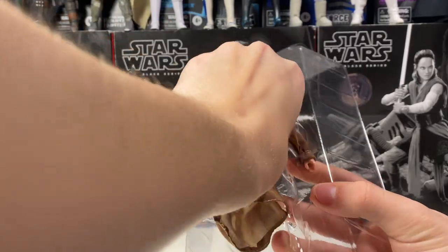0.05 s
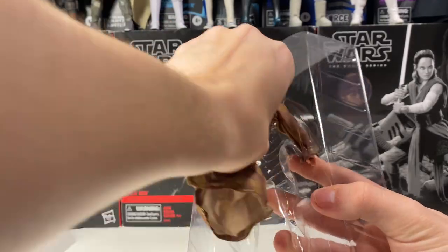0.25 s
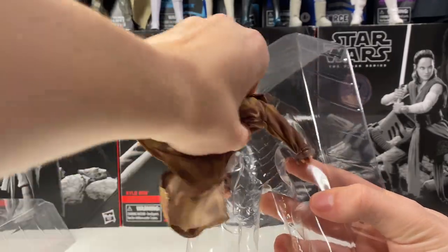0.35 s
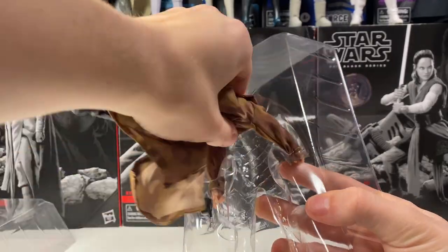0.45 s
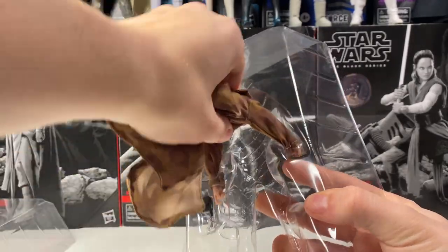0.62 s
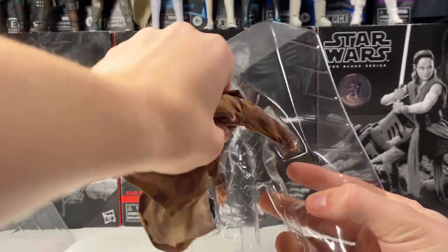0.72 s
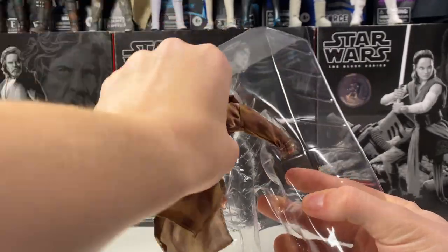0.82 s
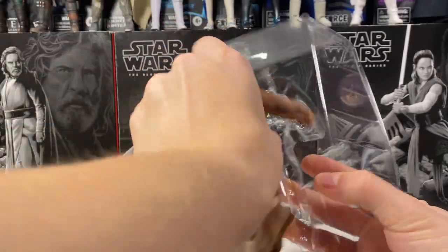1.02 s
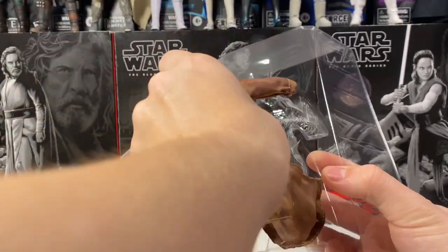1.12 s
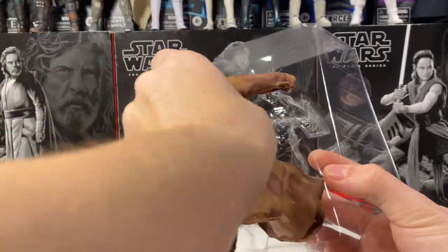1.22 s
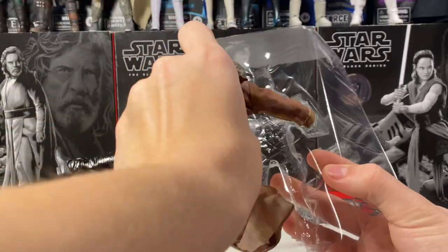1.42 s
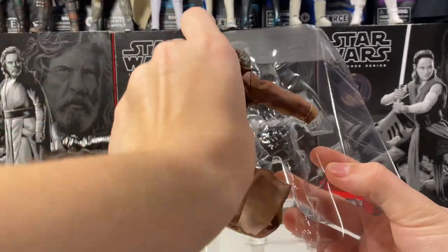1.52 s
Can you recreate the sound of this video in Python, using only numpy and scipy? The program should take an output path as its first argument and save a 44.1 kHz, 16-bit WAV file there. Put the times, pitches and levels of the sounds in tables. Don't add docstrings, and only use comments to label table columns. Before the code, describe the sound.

Close phone pickup of hands working a toy from a clear plastic tray: faint ticks, a hard crack, creaky bending mid-way, more bright snaps around one second and after, over soft rumble in a small room.

```python
import sys
import numpy as np
from scipy import signal
from scipy.fft import rfft, irfft
from scipy.io import wavfile
from scipy.ndimage import uniform_filter1d

SR = 44100
rng = np.random.default_rng(int(sys.argv[2]) if len(sys.argv) > 2 else 0)


def ratio_of_db(decibels):
    return 10 ** (np.asarray(decibels, float) / 20)


def master_out(mix):
    frames = np.transpose(np.atleast_2d(mix))
    ceiling = np.clip(frames, -1, 1)
    pcm = np.round(ceiling * 32767).astype(np.int16)
    wavfile.write(sys.argv[1], SR, pcm)


N = 68355
SPAN = 4096
EVEN_HZ = 250
PUSH_CYCLES = 0.55

# start in seconds, wall level in dB, wall pitch in Hz,
# bowl in dB re walls, ribs in dB re walls.
SNAPS = [(.2437, 0, 1930, -23, -8), (.2772, -28.5, 1940, -9, 13), (.2850, -27.5, 1940, -44, 9),
         (.3657, -21, 2320, -15.5, 1.5), (.3932, -20, 1450, 4, -22), (.3965, -20.5, 2600, -6.5, -7.5),
         (.5930, -26.5, 1650, -5, -9.5), (.5995, -35, 1740, -15, 1), (.6048, -17.5, 1680, -3.5, -3.5),
         (.8098, -25.5, 1680, -33, -4.5), (.8822, -16, 1700, -39, -21.5), (.9175, -21.5, 1990, -9.5, -5.5),
         (.9330, -20, 1870, 0.5, -0.5), (1.0250, -12.5, 2600, -27, -3.5), (1.0400, -29, 2300, 3, -2),
         (1.2502, -21, 1940, -4, -0.5), (1.2517, -18, 1340, -2.5, 11), (1.2580, -24, 2100, -8, -15),
         (1.4060, -28.5, 1590, 1, -12), (1.4578, -34, 1500, 4, 6.5), (1.4865, -26.5, 1710, -12, -7),
         (.1700, -31.5, 1640, -1, -5), (.2025, -30, 1610, -5, -9), (.7640, -31.5, 1830, -2, -12),
         (.0483, -33.5, 1570, -31, -11)]


def snaps():
    return volleys(SNAPS, spread_s=0.003, lead_db=-0.9, count=6)


# start in seconds, wall level in dB, wall pitch in Hz,
# bowl in dB re walls, ribs in dB re walls.
TICKS = [(.0185, -38.5, 1630, -20, 0), (.0225, -43.5, 1800, -0.5, 9), (.0575, -34, 1580, -31, -1.5),
         (.0672, -33, 1560, -29.5, -7), (.079, -40.5, 1460, 5, -1.5), (.503, -42, 1570, -12, -4.5),
         (.616, -40, 1570, -24, -19), (.626, -34, 1520, -6, -17), (.7325, -37.5, 1560, -8, -18),
         (.749, -36.5, 1700, 1, -27), (.7765, -33, 1640, -3, -51), (.787, -39, 1690, 6, -29),
         (.794, -32, 1580, 3.5, -22), (.948, -27, 1580, -16, -13), (.965, -28.5, 1550, -0.5, -34),
         (.987, -33.5, 1800, 1, -17), (1.282, -38, 1600, -21, -8), (1.377, -49, 1830, 8, 15),
         (1.383, -33.5, 1820, -1, -37)]


def ticks():
    return volleys(TICKS, spread_s=0.00083, lead_db=-2.0, count=4)


# start in seconds, wall level in dB, wall pitch in Hz,
# bowl in dB re walls, ribs in dB re walls.
CREAKS = [(.119, -36, 1540, -4, -8.5), (.141, -32.5, 1360, -9, -13), (.210, -49.5, 1600, -7, 15.5),
          (.222, -52, 1690, 20, 4), (.437, -45.5, 1870, 4, 7.5), (.449, -37.5, 1870, -2, 0),
          (.554, -24.5, 1520, -1.5, -17), (.563, -24.5, 1450, 3, -14.5), (.6458, -25, 1580, -21, -8.5),
          (.6575, -28.5, 1640, 2, -4), (.665, -26, 1670, -12, -24), (.673, -34, 1640, 2.5, -3),
          (.683, -35, 1520, 10, -27), (.7975, -23.5, 1420, 0.5, -15), (.804, -30.5, 1440, 6.5, -11),
          (.815, -28, 1524, 3.5, -26), (.822, -19.5, 1320, -27.5, -42), (.832, -29, 1460, -23, -37),
          (1.222, -39, 2020, -37, -4), (1.230, -36.5, 2000, -22, 3)]


def creaks():
    return volleys(CREAKS, spread_s=0.0074, lead_db=-3.5, count=9)


# pitch in Hz, level in dB, decay t60 in seconds.
BOWL = [(405, -8, 0.028), (478, -7, 0.022), (595, 0.5, 0.024), (774, -2.5, 0.0068), (856, -11.5, 0.0084),
        (940, -7.5, 0.005)]
# pitch in Hz, level in dB, decay t60 in seconds.
WALLS = [(1279.5, -1.5, 0.024), (1349, -3, 0.02), (1570, 3, 0.012), (1716, -3, 0.015), (1962, 3, 0.0087),
         (2287, -1.5, .012), (2310, -4, 0.022), (2613, -4.5, 0.01), (2904, 2.5, 0.0071), (3130, 4, 0.0053),
         (3470, -10.5, 0.00636)]
PART_GAINS_DB = (3.5, 8, 10)


def volleys(rows, spread_s, lead_db, count):
    slip_db, scatter_db = -8, 1.5
    patch_octaves, skirt_db = 0.48, -16
    bright_db_per_db, rib_tilt_db = 0.23, -1
    bowl_gain, wall_gain, rib_gain = PART_GAINS_DB
    out = np.zeros(N + SR)
    for start_s, db, hz, bowl_db, rib_db in rows:
        when, how_big, sign = rng.random((3, 3, count))
        late = -spread_s * np.log(1 - .9 * when)
        size = ratio_of_db(slip_db - scatter_db * np.log(how_big + 0.0032)) * np.sign(sign - .5)
        size = size * np.exp(-late / spread_s / 2)
        late[:, 0], size[:, 0] = 0, -ratio_of_db(lead_db)
        bowl, walls, ribs = (np.bincount((lag * SR).astype(int), a, SPAN) for lag, a in zip(late, size))

        def patch_db(f):
            skirt = np.where(f > hz, skirt_db, -40)
            return np.maximum(-6 * (np.log2(f / hz) / patch_octaves) ** 2, skirt)

        bowl_ring, wall_ring = strike(BOWL, lambda f: 0), strike(WALLS, patch_db)
        bowl = signal.fftconvolve(even(bowl, EVEN_HZ / 2), bowl_ring)[:SPAN]
        walls = signal.fftconvolve(even(walls, EVEN_HZ), wall_ring)[:SPAN]
        ribs = sizzle(ribs, rib_tilt_db + bright_db_per_db * (db + rib_db + 20))
        sound = ratio_of_db(bowl_db + bowl_gain) * bowl + ratio_of_db(wall_gain) * walls + ratio_of_db(rib_db + rib_gain) * ribs
        first = int(start_s * SR)
        out[first:first + SPAN] += ratio_of_db(db + 2.5) * sound
    return out[:N]


def strike(modes, gain_db):
    detune, scatter_db = .012, 1.5
    hz, db, t60 = np.array(modes).T[..., None]
    luck, pitch_luck = rng.standard_normal((2, len(modes), 1))
    t = np.arange(SR // 16) / SR
    gain = ratio_of_db(db + gain_db(hz) + scatter_db * luck)
    swell = 1 - np.exp(-(t * hz / PUSH_CYCLES) ** 2)
    tone = np.sin(2 * np.pi * hz * (1 + detune * pitch_luck) * t)
    rings = gain * np.exp(-np.log(1000) * t / t60) * swell * tone
    alternate = (-1.) ** np.arange(len(modes))[:, None]
    return np.sum(rings * alternate, axis=0) / np.sqrt(2 * np.sum(gain ** 2))


# frequency in Hz, density in dB per Hz.
CRACK = [(1500, -24), (3000, -2), (4300, 0), (5400, 3.5), (6800, 1), (8500, -7), (12000, -20.5),
         (16000, -31.5)]


def sizzle(clicks, tilt_db):
    sizzle_db, t60_s = 12, 0.022
    t = np.arange(SPAN) / SR
    tail = unit(rng.standard_normal(SPAN) * np.exp(-np.log(1000) * t / t60_s))
    hz = np.arange(SPAN // 2 + 1) * SR / SPAN + 1
    crack_hz, crack_db = np.array(CRACK).T
    colour_db = np.interp(np.log(hz), np.log(crack_hz), crack_db)
    colour_db = colour_db + tilt_db * np.log2(np.clip(hz / 6000, .5, 3))
    hiss = signal.fftconvolve(np.abs(clicks), tail)[:SPAN]
    return unit(even(clicks + ratio_of_db(sizzle_db) * hiss, EVEN_HZ, colour_db))


# start in seconds, level in dB, pitch in Hz, decay t60 in seconds.
FIZZ = [(0.0187, -36, 8300, .03), (.2030, -47, 11000, .03), (0.2787, -19, 12500, 0.046),
        (.3657, -30, 11700, .02), (.438, -35, 8000, 0.072), (0.518, -39, 7840, 0.023),
        (0.804, -37, 10000, 0.023), (.829, -42, 12000, .02), (0.897, -38, 7950, 0.035),
        (.908, -38, 11500, .03), (0.918, -27, 11100, 0.034), (.9330, -20.5, 8800, 0.045),
        (1.026, -17, 12400, 0.039), (1.191, -44, 10900, .02), (1.225, -34.5, 10000, 0.037),
        (1.2517, -18.5, 12500, 0.029), (1.378, -32, 11000, .03), (1.4578, -34, 11000, .03)]


def fizz():
    octaves, rise_s = 0.55, .0006
    out, t = np.zeros(N + SR), np.arange(SPAN) / SR
    f = np.arange(SPAN // 2 + 1) * SR / SPAN + 1
    for start_s, db, hz, t60 in FIZZ:
        fade = np.exp(-np.log(1000) * t / t60) * (1 - np.exp(-t / rise_s))
        burst = rng.standard_normal(SPAN) * fade
        colour_db = np.maximum(-6 * (np.log2(f / hz) / octaves) ** 2, -40)
        first = int(start_s * SR)
        out[first:first + SPAN] += ratio_of_db(db) * unit(even(burst, EVEN_HZ, colour_db))
    return out[:N]


# start in seconds, level in dB, pitch in Hz, decay t60 in seconds.
KNOCKS = [(.2440, -26, 810, 0.015), (.2450, -32.5, 429, .04), (.3945, -29.5, 590, 0.043),
          (0.558, -42, 197, .05), (0.805, -39, 210, 0.025), (.8825, -31, 1195, 0.011),
          (1.025, -30.5, 1250, .025), (1.0403, -35, 230, 0.031), (1.0415, -41.5, 400, 0.029),
          (1.2520, -36, 362, 0.021), (1.4065, -39, 415, 0.041), (1.4580, -33, 615, 0.047)]


def knocks():
    start_s, db, hz, t60 = np.array(KNOCKS).T[..., None]
    t = np.maximum(np.arange(N) / SR - start_s, 0)
    fade = np.exp(-np.log(1000) * t / t60) * (1 - np.exp(-t * hz / PUSH_CYCLES))
    return np.sum(ratio_of_db(db) * fade * np.sin(2 * np.pi * hz * t), axis=0)


# time in seconds, pitch in Hz, level in dB.
CUP = [
    (.55, 420.5, -55),
    (0.612, 405, -39.5),
    (.67, 386.6, -42.5),
    (0.749, 371, -52),
    (0.849, 394.4, -51.5),
]


def cup():
    width_hz = 22
    s, hz, db = np.array(CUP).T
    t = np.arange(N) / SR
    noise = rng.standard_normal((2, N))
    slow = signal.lfilter(*signal.butter(2, width_hz, fs=SR), noise[0] + 1j * noise[1])
    turns = np.cumsum(np.interp(t, s, hz)) / SR
    tone = level(np.real(slow * np.exp(2j * np.pi * turns)), 0)
    times = np.r_[s[0] - .02, s, s[-1] + .05]
    return tone * np.interp(t, times, np.r_[0, ratio_of_db(db - 3), 0])


# pitch in Hz, level in dB, decay t60 in seconds.
RIBS = [(3940, -0.5, 0.0011), (5240, 0.5, 0.0023), (6440, -0.5, 0.0015), (8070, -5.5, .0011),
        (10050, -14, 0.00053), (13000, -20, 0.0007)]
# time in seconds, rustle level in dB, rib share in dB, bowl share in dB.
HAND = [(0, -48, -13, -14), (.09, -56, -12, 3), (.2, -48, -14, 2.5), (.34, -55, -32, -1.5),
        (.48, -50, -13, -4.5), (.54, -53, -22, -6), (0.631, -49, -4.5, 8), (.72, -54.5, -13, 0),
        (.86, -61.5, -1.5, 12), (.98, -54, -4.5, 10.5), (1.08, -54, -24, -2), (1.15, -76.5, -33.5, -1),
        (1.209, -53, -1, -14.5), (1.32, -54.5, 2, -9.5), (1.42, -50.5, 4.5, -20), (1.55, -59.5, 11.5, -44)]


def rustle():
    slips_per_s, scatter_db, rub_db = 500, 2.5, -6
    chance, how_big, sign = rng.random((3, N))
    rub = rng.standard_normal((3, N))
    slips = (chance < slips_per_s / SR) * ratio_of_db(-scatter_db * np.log(how_big + 1e-3)) * np.sign(sign - .5)
    force = level(slips, 0) + ratio_of_db(rub_db) * rub
    hand, t = np.array(HAND).T, np.arange(N) / SR
    db, rib_db, bowl_db = (np.interp(t, hand[0], column) for column in hand[1:])
    bowl = level(ring(force[0], BOWL), 0) * ratio_of_db(db + bowl_db)
    walls = level(ring(force[1], WALLS), 0) * ratio_of_db(db)
    ribs = level(ring(force[2], RIBS), 0) * ratio_of_db(db + rib_db)
    return bowl + walls + ribs


def ring(x, modes):
    damping = .4
    out = 0
    for k, (hz, db, t60) in enumerate(modes):
        r = np.exp(-np.log(1000) / (damping * t60 * SR))
        w = 2 * np.pi * hz / SR
        mode = signal.lfilter([0, np.sin(w)], [1, -2 * r * np.cos(w), r * r], x)
        out = out + (-1) ** k * ratio_of_db(db) * mode
    return out / np.sqrt(2 * sum(ratio_of_db(m[1]) ** 2 for m in modes))


def room(x):
    early_db, early_t60_s = -6, 0.11
    late_db, late_t60_s = -21.5, 0.41
    rise_s, top_hz, even_hz = 0.0003, 10000, 90
    t = np.arange(SR // 2) / SR
    noise = rng.standard_normal((2, len(t))) * (1 - np.exp(-t / rise_s))
    early = unit(noise[0] * np.exp(-np.log(1000) * t / early_t60_s))
    late = unit(noise[1] * np.exp(-np.log(1000) * t / late_t60_s))
    tail = ratio_of_db(early_db) * early + ratio_of_db(late_db) * late
    tail = signal.lfilter(*signal.butter(1, top_hz, fs=SR), tail)
    return signal.fftconvolve(x, even((t == 0) + tail, even_hz))[:N]


# frequency in Hz, density in dB per Hz.
AIR = [(12, -0.5), (28, -9.5), (42, -12), (75, -22.5), (140, -26.5), (400, -37.5), (1400, -36),
       (16000, -52)]


def air():
    air_db, hum_db, hum_hz = -50.5, -61, 59.9
    hz, t = np.arange(N // 2 + 1) * SR / N + 1, np.arange(N) / SR
    air_hz, density_db = np.array(AIR).T
    shape = ratio_of_db(np.interp(np.log(hz), np.log(air_hz), density_db))
    noise = irfft(rfft(rng.standard_normal(N)) * shape, N)
    hum = ratio_of_db(hum_db) * np.sin(2 * np.pi * hum_hz * t)
    return level(noise, air_db) + np.sqrt(2) * hum


def level(x, db):
    return x * ratio_of_db(db) / np.sqrt(np.mean(x ** 2))


def unit(v):
    return v / np.sqrt(np.sum(v ** 2))


def even(x, width_hz, colour_db=0.):
    z, n = rfft(x), len(x)
    k = max(int(width_hz * n / SR), 1)
    power = uniform_filter1d(uniform_filter1d(np.abs(z) ** 2, size=k), size=k)
    c = irfft(np.log(ratio_of_db(colour_db) / np.sqrt(power + 1e-9)), n)
    c = np.r_[c[0], 2 * c[1:n // 2], c[n // 2], np.zeros(n // 2 - 1)]
    return irfft(z * np.exp(rfft(c)), n)


def scene():
    sheet = snaps() + ticks() + creaks() + fizz() + rustle()
    no_bass = signal.butter(3, 336, "high", fs=SR, output="sos")
    sheet = signal.sosfilt(no_bass, sheet)
    return (room(sheet + knocks() + cup()) + air())[None]


def roll_off(x):
    return signal.sosfilt(signal.butter(12, 16660, fs=SR, output="sos"), x)


def record(dry):
    treble_cut = signal.ellip(6, .3, 25, 15700, fs=SR, output="sos")
    mix = np.clip(signal.sosfilt(treble_cut, dry), -1, 1)
    return roll_off(mix)


dry = scene()
out = record(dry)
master_out(out)
```